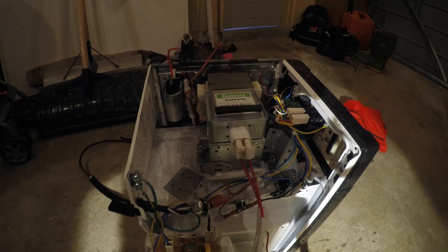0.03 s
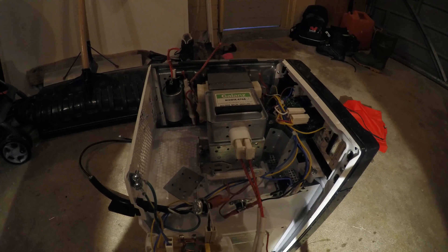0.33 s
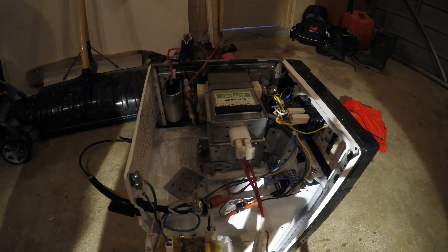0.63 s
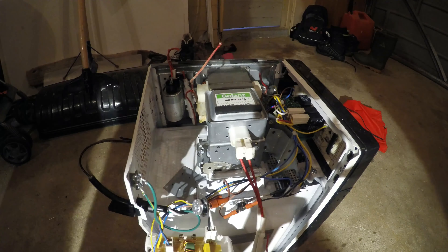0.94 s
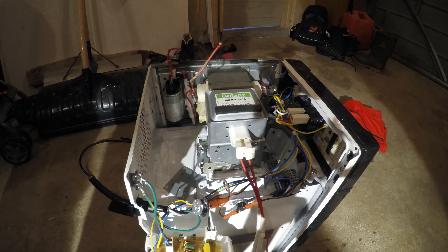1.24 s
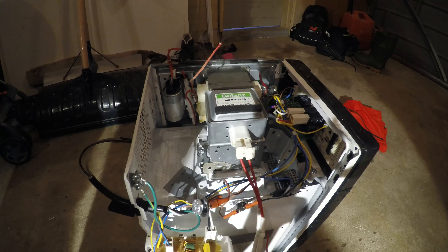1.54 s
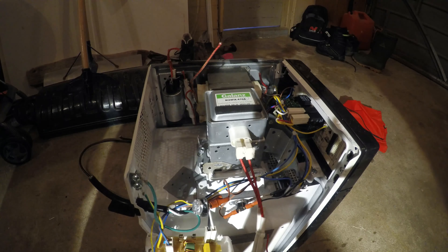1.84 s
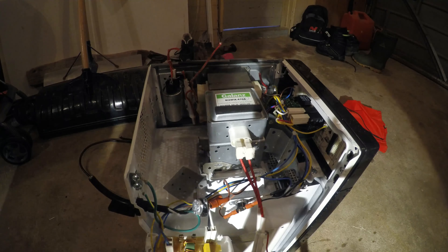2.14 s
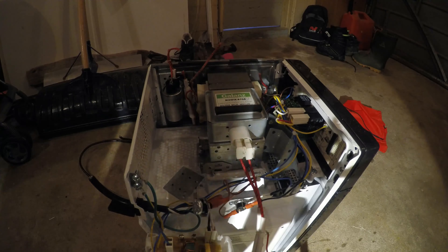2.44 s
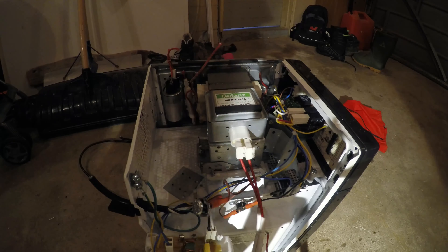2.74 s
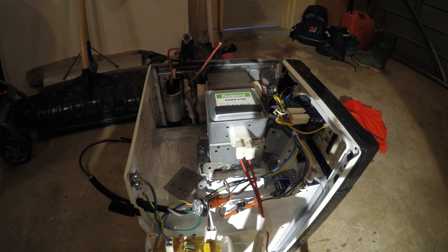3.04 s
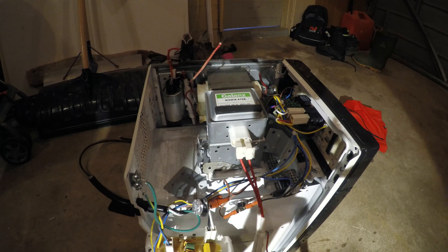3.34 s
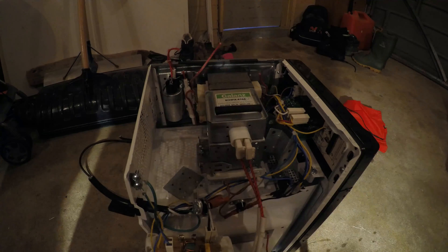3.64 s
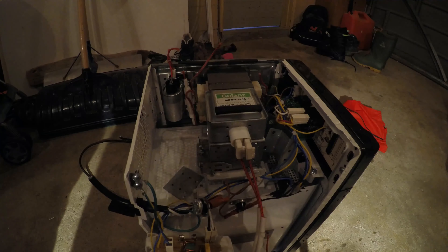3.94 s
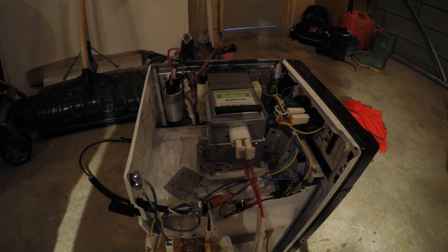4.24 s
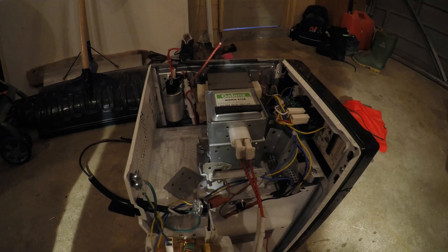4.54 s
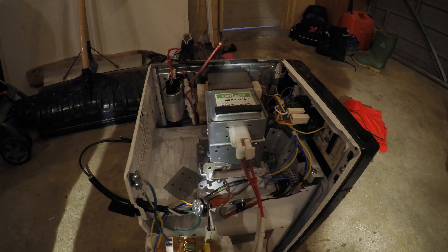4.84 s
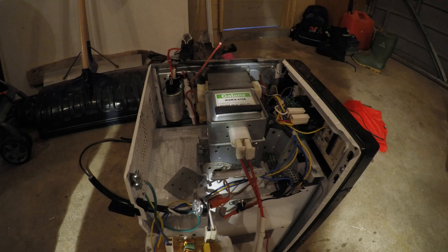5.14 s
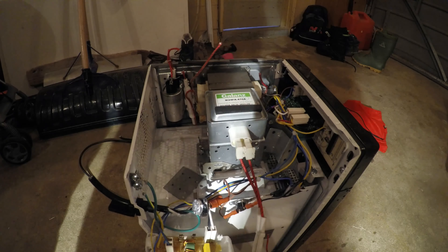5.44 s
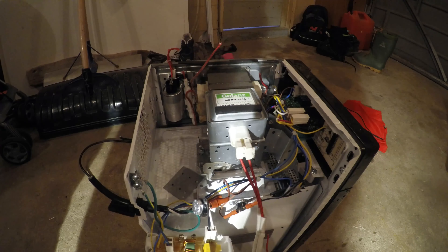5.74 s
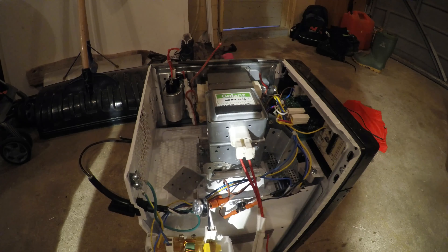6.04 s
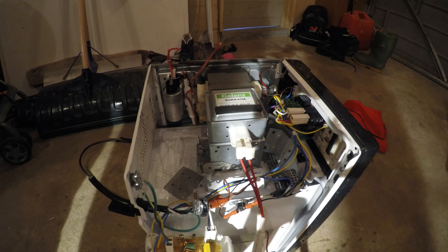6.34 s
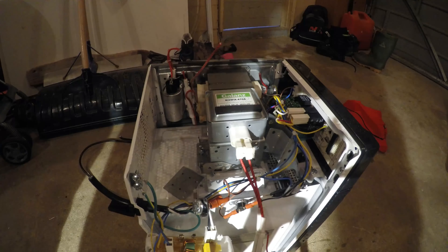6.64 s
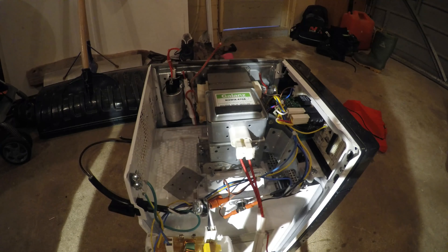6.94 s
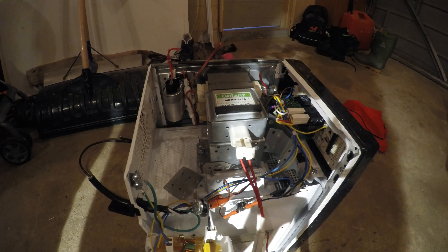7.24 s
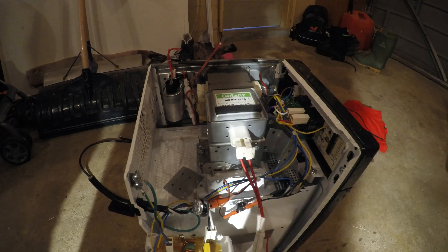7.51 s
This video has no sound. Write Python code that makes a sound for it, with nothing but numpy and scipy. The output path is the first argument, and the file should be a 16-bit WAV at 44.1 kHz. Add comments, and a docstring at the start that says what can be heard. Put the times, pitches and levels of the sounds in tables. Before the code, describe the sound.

Someone rummages through metal tools in a bare garage, with scraping drawers, sharp knocks and ringing clatter between short lulls.

```python
"""A bare garage, where someone a few steps away rummages for a tool.
Drawers scrape open and shut in tiny catches of friction, and an edge rasps on sheet metal.
Steel tools are stirred, land and bounce on each other; small parts ping and a thin panel rings.
A loose thing rocks to rest in a drawer. The room answers each knock, a deep rumble dies away
in the first seconds, and a faint hiss lies under it all."""
import sys
import numpy as np
from scipy import signal
from scipy.fft import rfft, irfft, next_fast_len
from scipy.io import wavfile

SR = 44100
rng = np.random.default_rng(int(sys.argv[2]) if len(sys.argv) > 2 else 0)


def generate_wav(signal):
    """Clip the signal to [-1, 1] and save it as 16-bit WAV at the path in sys.argv[1]."""
    frames = np.transpose(np.atleast_2d(signal))
    scaled = np.clip(frames, -1, 1) * 32767
    pcm = np.round(scaled).astype(np.int16)
    wavfile.write(sys.argv[1], SR, pcm)


N = 405279
TIME = np.arange(N) / SR
RING_TIME = np.arange(2 ** 15) / SR  # time axis of one ring-out


def amp(db):
    """Decibels to gain."""
    return 10 ** (np.asarray(db) / 20)


def unit(x):
    """Scale to rms 1."""
    return x / np.sqrt(np.mean(x ** 2) + 1e-20)


def along(points, hz):
    """Read (freq_hz, value) points on a log frequency axis."""
    freqs, values = np.transpose(points)
    return np.interp(np.log(hz + 1), np.log(freqs + 1), values)


def add(track, start_s, sound):
    """Mix a sound into a track."""
    part = track[max(0, round(start_s * SR)):][:len(sound)]
    part += sound[:len(part)]


def through(x, response):
    """Convolve, keeping the length."""
    return signal.fftconvolve(x, response)[:len(x)]


def fft_grid(x):
    """A padded FFT length for x and its frequencies."""
    size = next_fast_len(len(x) + 2 ** 13, True)
    return size, np.fft.rfftfreq(size, 1 / SR)


def bands(x, crossovers_hz):
    """Split x into neighbouring bands that sum to x."""
    size, hz = fft_grid(x)
    lowpasses = [1 / (1 + (hz / edge) ** 8) for edge in crossovers_hz]
    bandpasses = np.diff(lowpasses, axis=0, prepend=0, append=1)
    return irfft(rfft(x, size) * bandpasses, size)[:, :len(x)]


def noise(eq):
    """Noise of rms 1, coloured by (freq_hz, gain_db) points."""
    size, hz = fft_grid(TIME)
    white = rfft(rng.standard_normal(size))
    return unit(irfft(white * amp(along(eq, hz)), size)[:N])


def swell(full_s, rise_s, hold_s, fall_s, depth_db=21, curve=.99):
    """Envelope of one stroke: up by depth_db over the rise, held, down as far over the fall."""
    away = np.maximum((full_s - TIME) / rise_s, (TIME - full_s - hold_s) / fall_s)
    return amp(-depth_db * np.clip(away, 0, 10) ** curve)


def swells(rows):
    """Envelope of a series of strokes, each at its own level."""
    return sum(amp(db) * swell(*timing) for *timing, db in rows)


def fade(t60_s):
    """An exponential decay."""
    return np.exp(-np.log(1000) * RING_TIME / t60_s)


def ring(modes, scatter_db=3.5):
    """Struck metal rings freely, its modes at fresh strengths each time; energy 1."""
    sound = sum(amp(db + rng.normal(0, scatter_db)) * fade(t60_s) * np.sin(2 * np.pi * hz * RING_TIME)
                for hz, db, t60_s in modes)
    return sound / np.linalg.norm(sound)


# reverb time of the garage: freq_hz, t60_s
ROOM_DECAY = [(150, 0.62), (400, 0.32), (1000, 0.42), (3500, 0.37), (7000, 0.41), (11000, 0.28),
              (15000, 0.047)]
def garage(wet_db, walls_db, walls_s=.02):
    """One path through the room: direct sound, eight early reflections, a diffuse tail."""
    hz, t, spectra = signal.stft(rng.standard_normal(len(RING_TIME)), SR, nperseg=256)
    decay = amp(-60 * t / along(ROOM_DECAY, hz)[:, None])
    tail = signal.istft(spectra * decay, SR, nperseg=256)[1]
    path = amp(wet_db) * tail / np.linalg.norm(tail)
    for when, strength in rng.random((8, 2)):
        add(path, when * walls_s, np.array([amp(walls_db) * (strength - .5) * 2]))
    path[0] += 1
    return path


# body resonances of the drawer and its cabinet: centre_hz, width_hz, gain_db
CABINET_RESONANCES = [(171, 18, 5), (195, 10, -6.5), (234, 41, 8.5), (299.7, 4.8, 10.5), (391, 27, 3),
                      (491, 176, 5.5), (1050, 68, 1), (1304, 16, 6), (4370, 2000, 1)]
def cabinet(eq, size=2 ** 13):
    """Impulse response of a broad EQ curve with the cabinet's resonances on it."""
    hz = np.fft.rfftfreq(size, 1 / SR)
    resonances_db = sum(db / (1 + (2 * (hz - centre) / width) ** 2)
                        for centre, width, db in CABINET_RESONANCES)
    cepstrum = irfft(np.log(amp(along(eq, hz) + resonances_db)))
    # minimum phase, so nothing sounds ahead of the hit
    cepstrum[1:size // 2] *= 2
    cepstrum[size // 2 + 1:] = 0
    return irfft(np.exp(rfft(cepstrum)))[:size // 2]


def tool_pile(count, t60_at_2khz_s):
    """Assorted tools, each with its own crowd of modes, damped by lying on one another."""
    tools, t = [], RING_TIME[:2 ** 13]
    for _ in range(count):
        hz = rng.uniform(25, 122, size=(90, 1)) ** 2
        t60_s = t60_at_2khz_s * (hz / 2000) ** -.3 * np.exp(rng.normal(0, .25, size=hz.shape))
        decay = np.exp(-np.log(1000) * t / t60_s)
        modes = decay * np.sin(2 * np.pi * (hz * t + rng.random(hz.shape)))
        sound = np.sum(hz ** .58 / np.sqrt(t60_s) * modes, axis=0)
        tools.append(sound / np.linalg.norm(sound))
    return tools


def contact(tool, body, ring_db):
    """One sharp touch from its own spot in the room: a crack and a ringing tool."""
    crack = garage(wet_db=5.5, walls_db=-2.5)
    ringing = through(garage(wet_db=-1.5, walls_db=-10.5), tool)
    touch = crack / np.linalg.norm(crack) + amp(ring_db) * ringing / np.linalg.norm(ringing)
    return through(touch, body)


def friction(tools, eq, catches_per_s, range_db, ring_db):
    """Tiny random catches of a sliding contact shake the tools and the cabinet; rms 1."""
    shaken, body = np.zeros(N), cabinet(eq)
    count = int(catches_per_s / len(tools) * N / SR)
    for tool in tools:
        when, side, size = rng.random((count, 3)).T
        kicks = np.sign(side - .5) * amp(range_db * size)
        catches = np.bincount((when * N).astype(int), kicks, N)
        shaken += through(catches, contact(tool, body, ring_db))
    return unit(shaken)


# room tone: freq_hz, gain_db
HISS_EQ = [(12, -8), (20, 2), (74, -1), (167, -10), (233, -15), (283, -12.5), (443, -20), (841, -19),
           (2300, -34), (4130, -47), (5460, -32.5), (14500, -35), (15800, -38)]
def hiss(level_db=-43.5):
    """Still air: a steady bed of low noise with a thin hiss on top."""
    return amp(level_db) * noise(HISS_EQ)


# low swells at the opening: full_s, rise_s, hold_s, fall_s, level_db
RUMBLE_SWELLS = [(0, 0.019, 0.039, 0.34, -24.5), (.53, .05, .01, 0.14, -31.5),
                 (.75, 0.3, 0.74, 0.36, -43.5)]
def rumble(trim_db=-2):
    """Deep noise swells and dies away."""
    eq = [(30, -25), (60, -27), (80, 2), (105, -5.5), (150, -13), (400, -68)]
    return amp(trim_db) * swells(RUMBLE_SWELLS) * noise(eq)


# fader ride of the shuffling between blows: time_s, level_db
SHUFFLE_RIDE = [(0, -31), (1.0, -45.5), (1.2, -59), (1.85, -49), (3.45, -44), (3.65, -41.5), (4.3, -42),
                (4.8, -48), (5.6, -41.5), (5.95, -49), (6.05, -37), (6.45, -49.5), (7.08, -53.5),
                (7.42, -51.5), (7.55, -39.5), (8.5, -38), (8.77, -28.5), (9.0, -46), (9.2, -45.5)]
def shuffle(tools, trim_db=-1):
    """The hand keeps stirring the pile lightly, so the tools rub together."""
    eq = [(100, -34), (400, -3.5), (1000, 3.5), (2200, .5),
          (4200, 1), (6000, -11.5), (10000, -15.5), (15000, -30)]
    stirred = friction(tools, eq, catches_per_s=300, range_db=22, ring_db=-5.5)
    ride_db = np.interp(TIME, *np.transpose(SHUFFLE_RIDE))
    return amp(ride_db + trim_db) * stirred


# modes of the long steel tools: pitch_hz, level_db, t60_s
STEEL_MODES = [(1089, 19.5, 0.25), (1140, 24, 0.052), (1406, -15, 0.46), (1520, -1, 1), (1970, -18, 0.39),
               (2130, -14, 0.17), (2610, 3, 0.16), (2760, -23, 0.42), (3080, -7, 0.35), (3810, -8, 1),
               (5700, -9, .32), (6440, -6, .28), (8800, 28, 0.44), (9453, -2, .26)]
# tone of an impact: freq_hz, gain_db
CLATTER_EQ = [(40, -48), (100, -6), (180, -10), (240, -7), (300, -1.5), (400, -7), (560, 3), (1200, 2),
              (1500, 1), (2000, 2.5), (2700, 2), (4100, 1), (5300, -10), (7000, -13.5), (10000, -17),
              (12500, -30.5), (15800, -34)]
# splits between an impact's six registers: crossover_hz
HIT_CROSSOVERS = [190, 420, 900, 2200, 5500]
# what a tool lands on: surface -> (boom_db, thud_db, knock_db, clank_db, clash_db, tick_db), steel_db
SURFACE_VOICES = {"tray": ((-33, -24, -7.5, -3, -1, -17.5), -20), "tools": ((-20, -11, -21, 0, -1.5, -14),
                  -9), "drawer": ((-10.5, -5.5, -2.5, -3.5, -3, -13.5), -17),
                  "cabinet": ((-9.5, 3, -1, -6.5, -7, -18.5), -19),
                  "bar": ((-27.5, -20.5, -3, 3, -12.5, -26.5), -12),
                  "spanner": ((-28, -15, -23, -0.5, 0, -18.5), -12),
                  "casing": ((-26, -19.5, -9, 0.5, -0.5, -19), 5.9)}
# tools landing, harder ones brighter: start_s, surface, level_db, tilt_db (per register), attack_s
TOOL_HITS = [(.055, "spanner", -33.5, 1.5, .0003), (.087, "drawer", -29.5, 1.5, 0.00054),
             (.145, "spanner", -18.5, -1.5, .0015), (.93, "cabinet", -38, -2.5, 0.0011),
             (1.022, "casing", -31.5, -6, 0.0049), (1.14, "tray", -61.5, 13, .0005),
             (2.074, "drawer", -51, -7, .011), (2.1225, "drawer", -19.5, 2.5, 0.00011),
             (2.148, "casing", -18.5, -3.5, .014), (2.41, "tray", -44.5, 13.5, .001),
             (2.724, "tray", -25.5, -11, 0.0012), (2.728, "casing", -34, -10, 0.001),
             (2.773, "drawer", -30.5, 0, 0.00029), (2.841, "drawer", -26, 0.9, 0.00019),
             (3.36, "drawer", -31, 2, .0005), (3.541, "drawer", -36.5, 3.5, .0005),
             (3.687, "tray", -37, 4, .001), (3.706, "tray", -14.5, -3, 0.0016),
             (3.755, "tray", -19, -3, .0035), (3.923, "tray", -22, -4.5, .003),
             (3.963, "bar", -26.5, -1, 0.0043), (4.02, "cabinet", -34, 1.5, .0005),
             (4.143, "tray", -19.5, 1, 0.0074), (4.167, "tray", -17, 2.5, 0.0092),
             (4.194, "tray", -23.5, 0.5, 0.00055), (4.34, "tray", -32, -3, .0005),
             (4.422, "tray", -24.5, 1, 0.0015), (4.49, "tray", -29.5, 1.5, 0.00062),
             (4.844, "tray", -48, 2, .0005), (4.883, "tray", -39.5, .5, .0002),
             (4.934, "tray", -22.5, 0.5, 0.00028), (4.951, "tray", -19, 0, .001),
             (4.976, "tray", -22, 0.5, .0005), (4.997, "tray", -23.5, 0.5, .0005),
             (5.114, "drawer", -32.5, -1.5, 0.0042), (5.2, "tools", -38.5, -3.5, .001),
             (5.305, "bar", -41.5, 2, .002), (5.259, "cabinet", -39, -0.5, 0.0041),
             (5.367, "tray", -27.5, 1.4, .006), (5.385, "bar", -28, -5, 0.0006),
             (5.485, "bar", -32.5, -1, 0.036), (5.574, "drawer", -23, 0.5, 0.001),
             (5.581, "tray", -19, -5, .0006), (5.656, "cabinet", -26, -0.7, 0.0015),
             (5.72, "cabinet", -48, -.5, .0005), (5.778, "bar", -41.5, -3, .002),
             (5.839, "bar", -41, -1, .003), (5.889, "bar", -40, 7, 0.003),
             (5.965, "tray", -53.5, -10, .001), (6.038, "spanner", -29, -1.5, .003),
             (6.069, "casing", -42, -7, 0.0014), (6.23, "cabinet", -36.5, 2.5, 0.018),
             (6.283, "cabinet", -29.5, 0.5, 0.005), (6.305, "tools", -32.5, -2, 0.0035),
             (6.36, "tools", -48, 2, .001), (6.453, "tray", -42.5, 2.5, .0005),
             (6.54, "tools", -41.5, -4.5, 0.0044), (7.112, "drawer", -36, -0.5, 0.0056),
             (7.145, "drawer", -15, 2.5, 0.00013), (7.582, "spanner", -20, .8, 0.00012),
             (7.709, "drawer", -29.5, .5, .0018), (7.821, "tray", -38, 2.5, .0001),
             (7.914, "tools", -26.5, 1.5, 0.0018), (7.922, "tools", -20.5, 1, 0.0019),
             (7.982, "tools", -28, 2, 0.0018), (8.411, "casing", -23.5, -3, 0.01),
             (8.432, "bar", -29, 6.5, .0005), (8.548, "tools", -22.5, 1.5, 0.0015),
             (8.566, "tools", -16.5, 1, 0.0013), (8.598, "casing", -22.5, 1.5, 0.0013),
             (8.629, "tools", -21, 2, 0.0011), (8.838, "tools", -24, 1, .0007),
             (8.86, "casing", -31, 1, 0.0024)]
def clatter(tools, rattle_s=.02, first_db=5, snap_per_tilt=2, bounce_db=-3, loss_db=6, trim_db=-2.5):
    """A tool lands and bounces on its neighbours; every contact cracks and rings another piece."""
    out, body = np.zeros(N), cabinet(CLATTER_EQ)
    contacts = [contact(tool, body, ring_db=0) for tool in tools for _ in range(3)]
    long_tools = [through(ring(STEEL_MODES), body) for _ in range(5)]
    steps_above_clank = np.arange(-3, 3)
    for i, (start_s, surface, level_db, tilt_db, attack_s) in enumerate(TOOL_HITS):
        registers_db, steel_db = SURFACE_VOICES[surface]
        first, *bounces = rng.permutation(len(contacts))[:5]
        # a harder blow puts more of itself into the first contact
        blow = amp(first_db + snap_per_tilt * max(tilt_db, 0)) * contacts[first]
        blow += amp(steel_db) * long_tools[i % len(long_tools)]
        for bounce, when in zip(bounces, rng.random(len(bounces))):
            add(blow, when * rattle_s, amp(bounce_db - loss_db * when) * contacts[bounce])
        # a glancing blow builds up instead of starting at once
        registers = bands(blow, HIT_CROSSOVERS) * (1 - np.exp(-RING_TIME / attack_s))
        # surface and hardness set each register's level over the first 50 ms
        onset_rms = np.std(registers[:, :round(.05 * SR)], axis=1)
        onset_db = level_db + trim_db + np.array(registers_db) + tilt_db * steps_above_clank
        add(out, start_s, (amp(onset_db) / onset_rms) @ registers)
    return out


# tone of a slide: freq_hz, gain_db
SLIDE_EQ = [(29, -41), (50, -15.5), (155, -5.5), (188, -10), (233, -5), (378, -4), (436, -5), (657, 1),
            (797, 0.5), (1090, 0.5), (1990, -12), (4090, -13.5), (5730, -20.5), (10200, -12.5),
            (15800, -40)]
# splits between bass, grind, scrape and grit: crossover_hz
SLIDE_CROSSOVERS = [450, 1500, 5500]
# drawers and tools sliding: full_s, rise_s, hold_s, fall_s, level_db, weight_db, edge_db, grit_db
SLIDE_STROKES = [(0.205, 0.12, 0.058, .1, -24, -4, -2.5, -15), (0.299, .04, 0.02, .1, -20.5, -8.5, -6, -23),
                 (0.373, 0.039, 0.015, 0.2, -19.5, -2.5, -10.5, -15.5),
                 (0.753, 0.3, 0.051, 0.5, -39.5, 0.5, 5, -14.5),
                 (2.037, 0.13, .01, .08, -43, -16, 1.5, -16),
                 (2.086, .02, 0.025, 0.057, -28.5, -12, -9.5, -16),
                 (2.299, .16, 0.13, 0.25, -19.5, 0, -1.5, -20),
                 (2.981, 0.16, 0.17, 0.22, -19, -3.5, -3.5, -19), (3.37, 0.009, .01, 0.11, -33, 1, -6, -3),
                 (4.108, .06, .03, 0.072, -34.5, -22, 2, -25),
                 (4.33, 0.19, .17, 0.13, -35.5, -27, -1.5, -23),
                 (4.559, 0.06, 0.017, 0.15, -27, -23, 4.5, -18),
                 (8.253, 0.21, 0.056, 0.14, -29.5, -6, 12, -28.5)]
def slides(tools, bass_curve=.67, trim_db=-1):
    """Each stroke speeds up and slows; a heavy drawer rumbles on, light tools only scrape."""
    rubbing = friction(tools, SLIDE_EQ, catches_per_s=700, range_db=22, ring_db=-2)
    bass, grind, scrape, grit = [unit(band) for band in bands(rubbing, SLIDE_CROSSOVERS)]
    out = np.zeros(N)
    for *timing, level_db, weight_db, edge_db, grit_db in SLIDE_STROKES:
        stroke = swell(*timing)
        weight = amp(weight_db) * stroke ** bass_curve * bass
        edge = amp(edge_db) * (scrape + amp(grit_db) * grit)
        out += amp(level_db + trim_db) * (weight + stroke * (grind + edge))
    return out


# an edge dragged over sheet metal: full_s, rise_s, hold_s, fall_s, level_db
RASP_STROKES = [(.525, 0.04, 0.024, 0.14, -24.5), (8.11, 0.015, 0.039, .12, -31),
                (8.28, 0.087, .03, 0.14, -24.5)]
def rasp(tools):
    """A thin edge catches very fast and excites a high resonance."""
    eq = [(1500, -10), (3100, -5), (3800, -1), (4350, 0),
          (5000, -18), (8000, -26), (9800, -21), (12000, -38)]
    return swells(RASP_STROKES) * friction(tools, eq, catches_per_s=1700, range_db=-8, ring_db=2)


# single parts ringing out: start_s, pitch_hz, peak_db, t60_s
PART_PINGS = [(1.02, 2626, -29.5, 0.28), (1.029, 415, -23.5, 0.18), (2.133, 1050, -10.5, 0.16),
              (3.146, 2420, -18.5, 0.12), (3.925, 10930, -37, 0.13), (3.99, 295.5, -24, .36),
              (4.17, 14050, -43, .25), (4.21, 13720, -31, .4), (4.96, 13900, -38, .5),
              (5.576, 577, -9, 0.036), (6.04, 14000, -52, .5), (6.54, 10950, -49, 0.25),
              (7.15, 159.6, -28.5, 0.26), (7.926, 1146, -15.5, 0.13), (8.421, 300, -19.5, 0.09),
              (8.566, 1284, -16, 0.35), (8.589, 1080, -17, .24), (8.839, 1200, -24, .2)]
def pings(twin_db=-5, split_at_4khz_hz=37):
    """A part that hangs free rings on a close pair of modes, which beat."""
    out = np.zeros(N)
    for start_s, pitch_hz, peak_db, t60_s in PART_PINGS:
        twin_hz = pitch_hz + split_at_4khz_hz * np.sqrt(pitch_hz / 4000)
        pair = np.sin(2 * np.pi * pitch_hz * RING_TIME)
        pair += amp(twin_db) * np.sin(2 * np.pi * twin_hz * RING_TIME)
        note = through(fade(t60_s) * pair, garage(wet_db=3, walls_db=-31))
        add(out, start_s, amp(peak_db) * note / np.abs(note).max())
    return out


# modes of the drawer's thin steel panel: pitch_hz, level_db, t60_s
PANEL_MODES = [(3570, 4, .16), (3570, -5, .25), (3750, -8, .3), (3795, -3, .2), (3905, 7, 0.31),
               (3975, 5, .2), (3900, -11, .26), (4115, -4, .2), (4200, -3, .3), (4265, -11, .24),
               (4300, -3, .3), (4500, -5, .22)]
# blows that set it ringing: start_s, peak_db
PANEL_HITS = [(1.021, -26), (2.121, -7.5), (7.146, -9.5), (8.839, -14)]
def panel():
    """Some blows shake a thin panel, whose crowded modes give a rough, high ring."""
    out = np.zeros(N)
    for start_s, peak_db in PANEL_HITS:
        note = through(ring(PANEL_MODES), garage(wet_db=-12, walls_db=-7))
        add(out, start_s, amp(peak_db) * note / np.abs(note).max())
    return out


# tone of a dull bump in the drawer: freq_hz, gain_db
BUMP_EQ = [(80, -22), (160, -15), (260, 0), (560, -9), (800, -19.5), (2000, -32), (8000, -70)]
def rocking(start_s=1.188, swings=7, first_swing_s=.166, shrink=.82, first_peak_db=-27, loss_db=2.1):
    """A loose thing rocks ever faster and softer, sounding the low resonances of the cabinet."""
    out, body = np.zeros(N), cabinet(BUMP_EQ)
    for k in range(swings):
        swing_s = first_swing_s * shrink ** k
        tip_back_s = start_s + .37 * swing_s
        for bump_s in (start_s, tip_back_s):
            bump = through(garage(wet_db=.5, walls_db=-4), body)
            add(out, bump_s, amp(first_peak_db - loss_db * k) * bump / np.abs(bump).max())
        start_s += swing_s
    return out


def scene():
    """One pile of tools, slid, stirred and struck over the room tone, in mono."""
    tools = tool_pile(count=9, t60_at_2khz_s=.12)
    rubbing = slides(tools[:4]) + shuffle(tools[4:7]) + rasp(tools[7:])
    impacts = clatter(tools) + pings() + panel() + rocking()
    return (rubbing + impacts + rumble() + hiss())[None]


def record(dry, top_hz=15600):
    """Soft-clip the highest peaks and cut everything above top_hz."""
    rounded = dry / (1 + dry ** 6) ** (1 / 6)
    size, hz = fft_grid(TIME)
    return irfft(rfft(rounded, size) * (hz < top_hz), size)[:, :N]


dry = scene()
out = record(dry)
generate_wav(out)
```